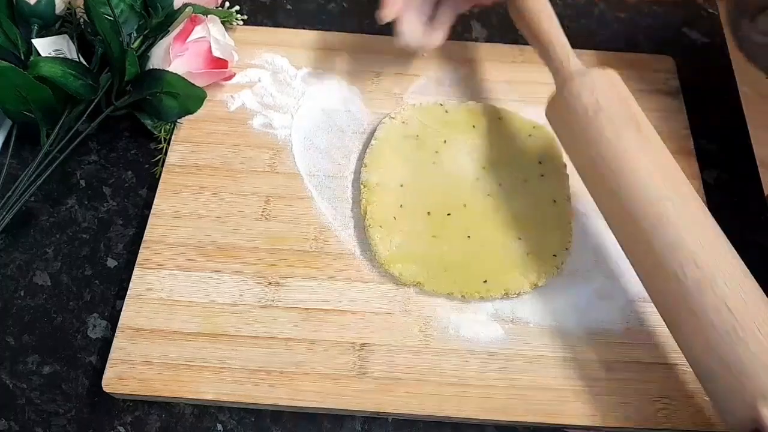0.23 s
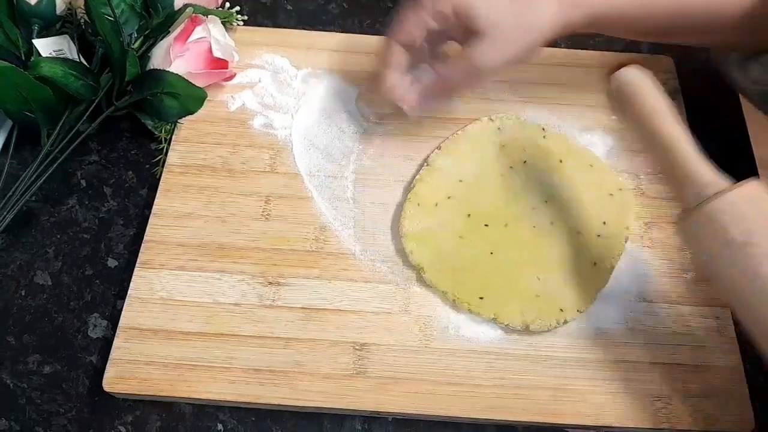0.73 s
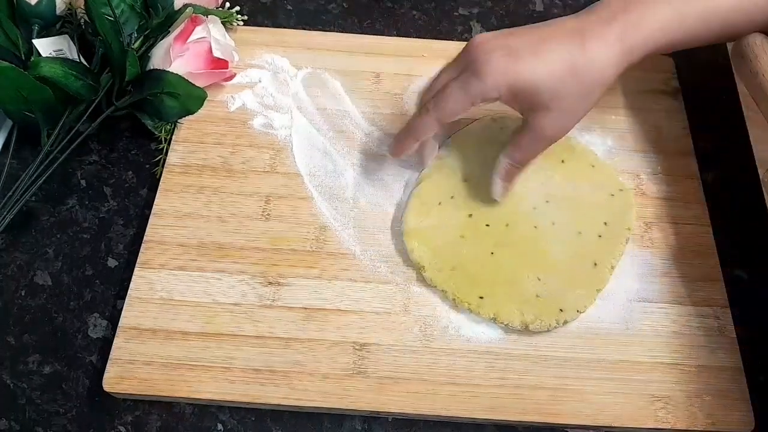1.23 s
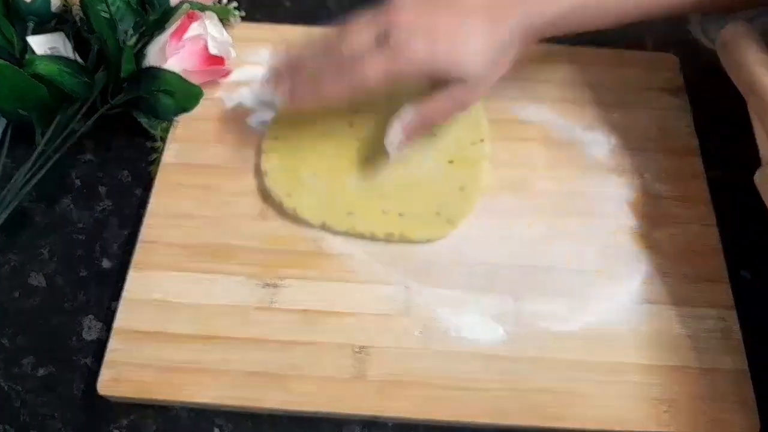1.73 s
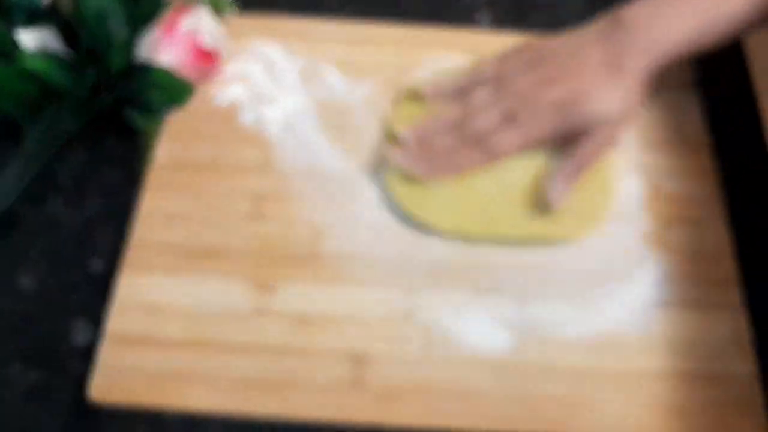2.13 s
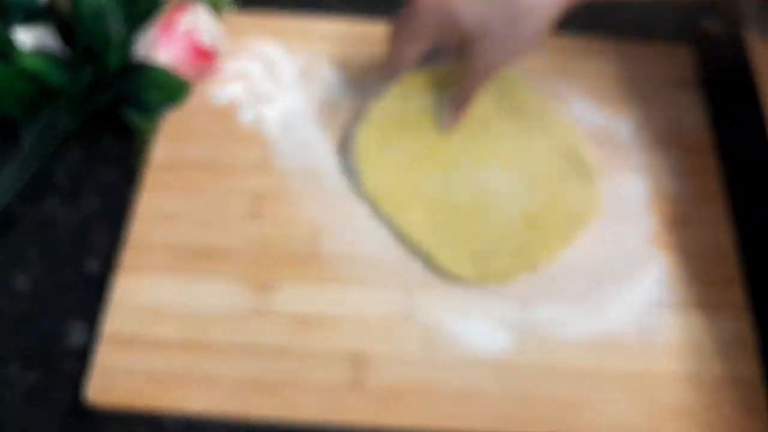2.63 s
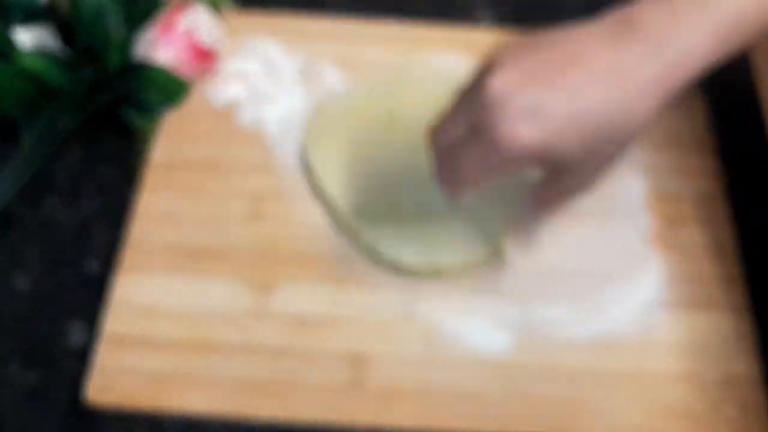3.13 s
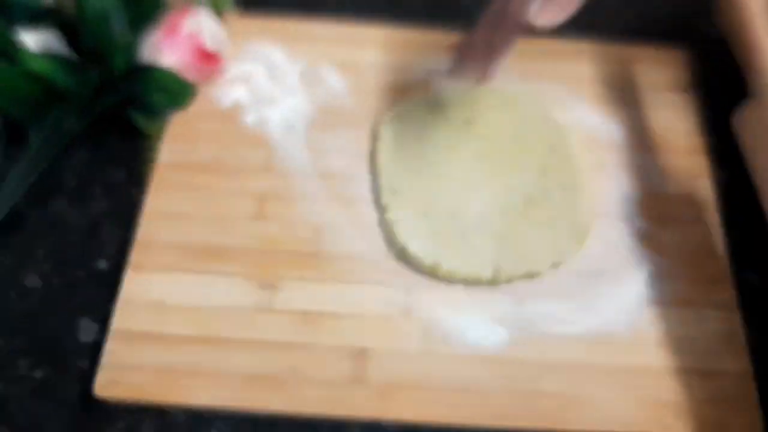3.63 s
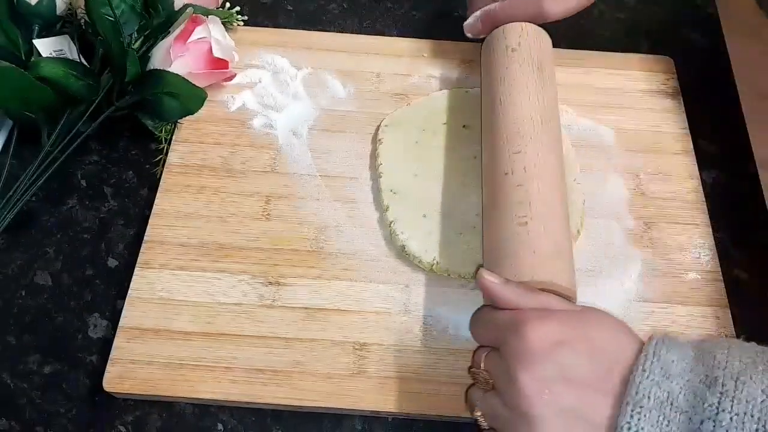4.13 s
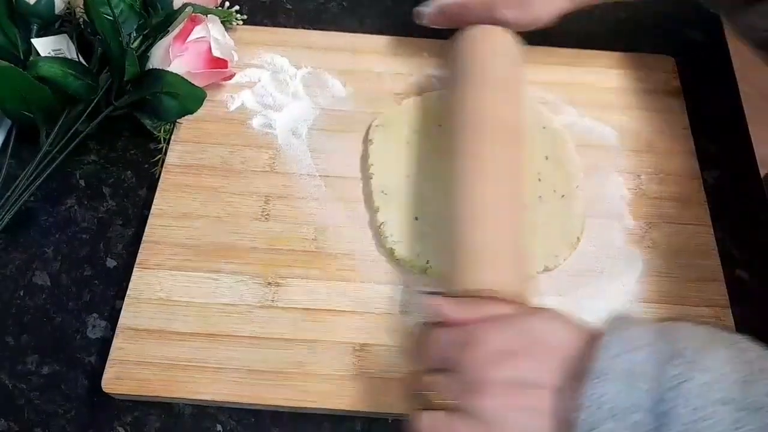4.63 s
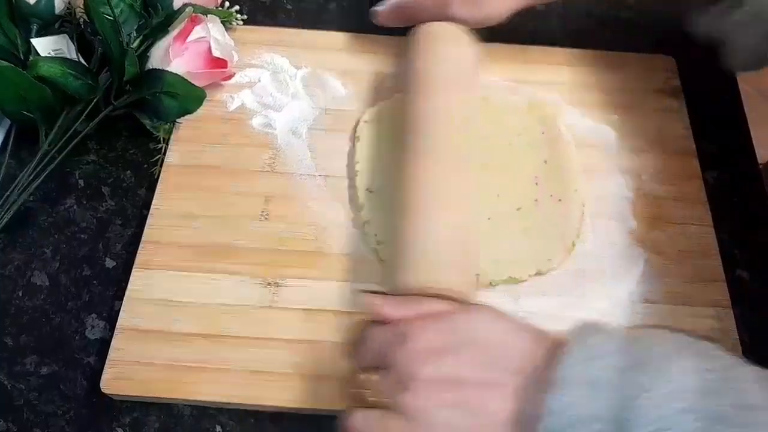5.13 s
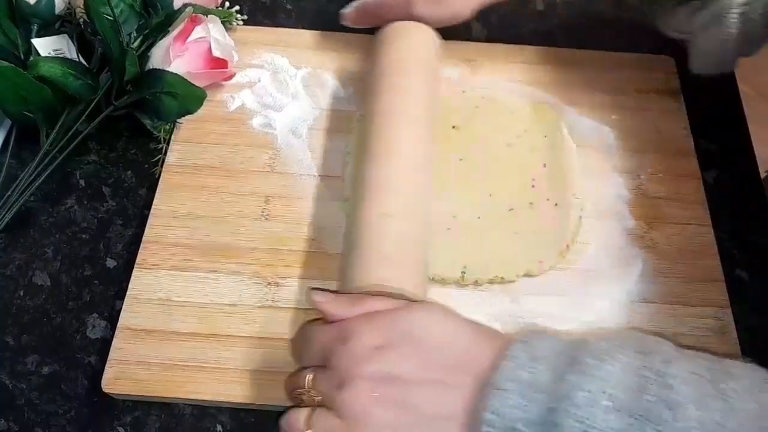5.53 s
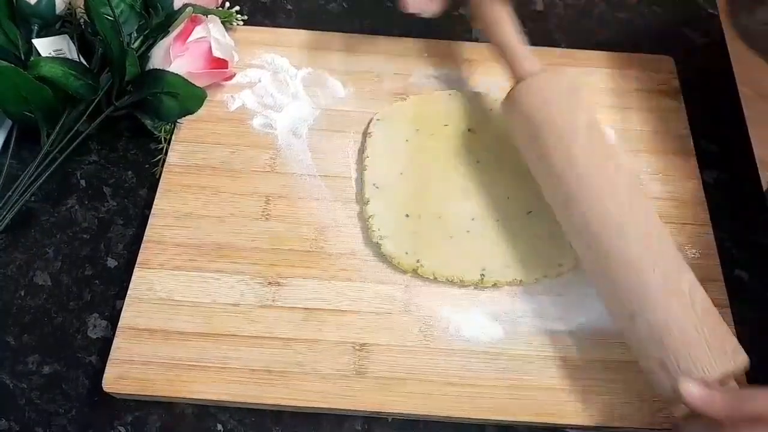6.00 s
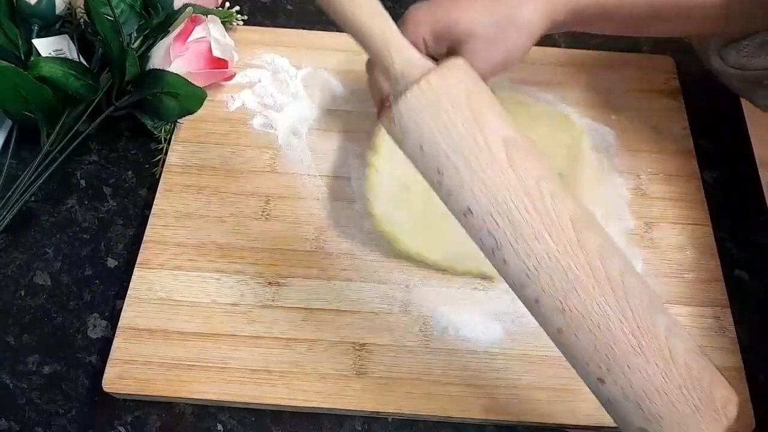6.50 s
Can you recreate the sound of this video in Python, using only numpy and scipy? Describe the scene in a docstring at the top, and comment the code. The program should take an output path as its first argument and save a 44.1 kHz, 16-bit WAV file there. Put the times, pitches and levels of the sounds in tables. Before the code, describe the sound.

In a kitchen, a wooden rolling pin clicks, then floured dough swishes across a wooden board. A sharp slap makes the board ring, followed by soft pats and more gritty sliding. The pin clicks again and rolls back and forth with quiet rubbing, a low rumble and soft thuds, then clicks once more. An appliance hums and hisses faintly behind the stereo sound.

```python
"""In a kitchen, a hand slides floured dough over a wooden board, pats and flips it, then rolls it out.
Flour dragging over the wood swishes, and skin or wood squeaks where it sticks. The board rumbles as
weight presses it against the counter. Soft pats thud, hard knocks make the board ring, and the wooden
rolling pin clicks now and then. An appliance hums and hisses behind it all.
The sound is heard through two microphone openings close together, left and right."""
import sys
import numpy as np
from scipy import signal
from scipy.fft import rfft, irfft
from scipy.io import wavfile
from scipy.ndimage import uniform_filter1d

SR = 44100
rng = np.random.default_rng(int(sys.argv[2]) if len(sys.argv) > 2 else 0)


def pcm_store(signal):
    """Save signal as 16-bit PCM."""
    levels = np.round(np.clip(np.atleast_2d(signal), -1, 1) * 32767)
    wavfile.write(sys.argv[1], SR, levels.astype(np.int16).T)


N = 298094

# The board's natural tones. Each row: pitch in Hz, level in dB, seconds to fade by 60 dB.
BOARD_TONES = [(317, -5.5, 0.041), (454, 3.5, 0.065), (569, 6, 0.027), (825, 2.5, 0.033),
               (1040, 5.5, 0.018), (1377, -14, 0.056), (1913, -3.5, 0.025), (2354, 1.5, 0.0084),
               (2854, -0.5, 0.011), (3770, -15, 0.0082), (4540, -12, 0.0062), (5800, -20, 0.0057)]
# How the two microphone openings compare. Each row: frequency in Hz, likeness from 0 to 1,
# how far the left wave leads in radians, how much louder the left is in dB.
MIC_PAIR = [(30.2, 0.8, 0.98, 0), (70, 0.99, 0.44, 1.5), (130, 0.9, 0.065, 4), (188, 0.8, -0.81, 8.5),
            (337, 0.37, 0.49, -0.5), (636, 0.66, -0.8, 8.5), (730, 0, 0.31, 10), (1180, 0, -1.48, 4),
            (1610, 0, -1.08, 3), (2500, 0.09, -0.76, 3.5), (3120, 0.24, -1.35, 6.5), (4000, 0, 0.26, 2),
            (6760, 0, 0.39, 2), (8300, 0.04, 1, 6.5), (11700, 0, -0.029, 3)]


def gain_of(db):
    """Turns decibels into a number to multiply a sound by."""
    return 10 ** (np.asarray(db) / 20)


def evened(x):
    """Scales a signal to an average power of 1."""
    return x / np.sqrt(np.mean(x ** 2) + 1e-20)


def wander(length, span):
    """A smooth random curve; a longer span, in samples, makes it slower."""
    return evened(uniform_filter1d(uniform_filter1d(rng.standard_normal(length), span), span))


def look_up(table, hz, column=1):
    """Reads a table at any frequency, gliding between its rows."""
    table = np.asarray(table)
    return np.interp(np.log(hz + 1), np.log(table[:, 0] + 1), table[:, column])


def add(mix, start, sound):
    """Mixes a sound in at a start time in seconds."""
    part = mix[round(start * SR):][:len(sound)]
    part += sound[:len(part)]


def mic_gains(hz):
    """How the left and right openings each scale and shift a wave."""
    left = gain_of(look_up(MIC_PAIR, hz, column=3) / 2) * np.exp(.5j * look_up(MIC_PAIR, hz, column=2))
    return np.array([left, 1 / left])


def noise(colour_db, patchy_db, size):
    """Stereo noise shaped by colour_db(hz, seconds), with drifting louder and softer patches."""
    hop = size // 4
    hz, t = np.fft.rfftfreq(size, 1 / SR)[:, None], np.arange(N // hop + 5) * hop / SR
    a, b, c, d, patches = rng.standard_normal((len(t), len(hz), 5)).T
    patches = uniform_filter1d(patches, size // 80, axis=0)
    patches = evened(uniform_filter1d(patches, 3000 // hop, axis=1))
    likeness = np.clip(look_up(MIC_PAIR, hz), 0, 1)
    left = a + 1j * b
    right = likeness * left + np.sqrt(1 - likeness ** 2) * (c + 1j * d)
    spectra = np.array([left, right]) * mic_gains(hz) * gain_of(colour_db(hz, t) + patchy_db * patches)
    out = signal.istft(spectra, nperseg=size, noverlap=size - hop)[1][:, :N]
    return out / np.sqrt(np.mean(out.mean(0) ** 2))


def swells(peak, db, rise, hold, fall, roundness):
    """Times, and each movement's power at those times; a rise or a fall covers 20 dB."""
    step_s = .002
    t = np.arange(0, N / SR + step_s, step_s)[:, None]
    away = np.maximum(np.maximum((peak - t) / rise, (t - peak - hold) / fall), 0)
    return t[:, 0], gain_of(db - 20 * away ** roundness) ** 2


def ring(tones, tilt_db):
    """Struck wood rings with fading tones; tilt_db per octave makes it brighter or duller."""
    t = np.arange(SR // 4) / SR
    out = np.zeros(len(t))
    for k, (hz, db, fade_s) in enumerate(tones):
        level = gain_of(db + tilt_db * np.log2(hz / 1000) - 60 * t / fade_s)
        out += (-1) ** k * level * np.sin(2 * np.pi * hz * t)  # neighbours start in opposite directions
    out *= 1 - np.exp(-t / 0.001)  # the contact takes a moment
    return out / abs(out).max()


def appliance():
    """An appliance hisses with fuzzy whistles while its motor gives a wavering hum."""
    # The shape of the hiss. Each row: frequency in Hz, level in dB.
    hiss_shape = [(15, -62), (25, 2), (183, -10.5), (313, -6.5), (741, -22.5), (1380, -35), (1530, -36.5),
                  (1950, -18.5), (3530, -44), (4620, -20), (5880, -31), (7290, -24.5), (15500, -39.5)]
    # Whistles in the hiss. Each row: pitch in Hz, width in Hz, boost in dB.
    whistles = [(265, 130, 7), (458, 8.6, 17), (1805, 260, 12), (4450, 230, 6), (7190, 540, 11)]
    # The motor's tones. Each row: pitch in Hz, level in dB.
    motor_tones = [(100, -68.5), (165, -64.5), (200, -64.5), (300, -70)]
    t = np.arange(N) / SR
    wavers_db = [2 * wander(N, span=3000) for _ in motor_tones]
    hum = np.zeros((2, N))
    for (hz, db), waver_db in zip(motor_tones, wavers_db):
        tone = np.sqrt(2) * np.sin(2 * np.pi * (hz * t + rng.random()))
        hum += gain_of(db + waver_db) * tone * abs(mic_gains(np.array([hz])))

    def colour(hz, _):
        whistle_db = sum(db / (1 + (2 * (hz - pitch) / width) ** 2) for pitch, width, db in whistles)
        return look_up(hiss_shape, hz) + whistle_db
    return gain_of(-61.5) * noise(colour, patchy_db=.6, size=2048) + hum


def board_rumble():
    """The board flexes on the counter; its low pitch shifts with where the weight lies."""
    # Weight leaning on the board. Each row: peak time in seconds, level in dB,
    # rise and fall in seconds, pitch in Hz.
    leans = [(.05, -52.5, 0.37, 0.057, 114), (.25, -62, .2, .12, 124), (.42, -71, 0.13, .9, 126),
             (.708, -51, 0.16, .35, 98), (.93, -52, 0.27, 0.13, 113), (1.15, -58.5, 0.16, 0.29, 112),
             (1.32, -50, .15, .11, 99), (1.65, -41, 0.073, 0.15, 107), (1.86, -55.5, .3, 0.54, 98),
             (2.1, -55.5, 0.46, 0.3, 115), (2.256, -52.5, .3, 0.089, 118), (2.426, -56, 0.059, .12, 112),
             (2.72, -59.5, 0.29, 0.13, 119), (3.11, -47.5, 0.082, 0.19, 95), (3.32, -53, 0.044, 0.73, 105),
             (3.45, -58, .3, 0.09, 106), (4.17, -48.5, 0.054, 0.26, 107), (4.68, -47, 0.12, 0.084, 112),
             (4.83, -54, .07, 0.45, 108), (4.98, -59, 0.31, 0.12, 111), (5.21, -47, .11, 0.19, 117),
             (5.42, -50.5, 0.32, 0.32, 128), (5.79, -51.5, 0.12, 0.062, 112), (6.08, -56.5, 0.13, .45, 105),
             (6.72, -61.5, 1, .9, 120)]
    peak, db, rise, fall, lean_hz = np.transpose(leans)
    times, power = swells(peak, db, rise, 0, fall, roundness=0.83)
    rest_power, rest_hz = gain_of(-91) ** 2, 125  # the board with no weight on it
    total = power.sum(1) + rest_power
    pitch = (power @ lean_hz + rest_hz * rest_power) / total

    def colour(hz, t):
        off_pitch = np.log((hz + 1) / np.interp(t, times, pitch)) / 0.68
        return -24 + 24 / (1 + off_pitch ** 2) - 20 * (hz > 400)
    flex = noise(colour, patchy_db=-1.1, size=2048)
    flex /= np.sqrt(uniform_filter1d(flex.mean(0) ** 2, 3500) + 0.019)  # smooths chance loudness swings
    return np.interp(np.arange(N) / SR, times, np.sqrt(total)) * flex


def flour_swish():
    """Flour grains drag over the wood with a gritty hiss, and the board's tones sing along."""
    # The shape of the flour's hiss. Each row: frequency in Hz, level in dB.
    flour_shape = [(210, -33), (350, -5), (692, -4.5), (786, -1.5), (906, -3.5), (1050, 0.5), (1660, -3),
                   (1880, -1.5), (2170, -5), (3720, -2), (8090, -6.5), (10400, -19.5), (14500, -27),
                   (15500, -31)]
    # Strokes of dough, hand or pin, and brief noisy tails of clicks and slaps. Each row: peak time in
    # seconds, level in dB, rise, hold and fall in seconds, then treble and body in dB above that level.
    strokes = [(0.032, -63, 0.13, .01, 0.18, -9, -1), (0.197, -74.5, 0.28, 0.31, 0.22, 1.5, -3.5),
               (0.524, -61.5, 0.2, 0.057, 0.14, -7, -5), (0.804, -64.5, 0.033, 0.031, 0.054, -3.5, -5),
               (0.899, -48, 0.035, 0.034, 0.077, -4.5, -10.5), (1.14, -64, 0.2, .04, 0.24, -4, -6),
               (1.278, -63.5, 0.15, 0.021, 0.084, -12, -0.5), (1.515, -56.5, 0.21, 0.074, .05, -6.5, -8),
               (1.612, -52, 0.016, 0.0078, 0.039, -9, -4), (1.648, -58, .04, 0.0086, 0.15, -12, 4),
               (1.822, -46.5, 0.045, 0.13, 0.35, -8.5, -6.5), (2.09, -48.5, 0.21, 0.06, 0.14, -8, -7),
               (2.226, -57, 0.085, .03, 0.061, -5, -13), (2.487, -62, 0.14, .03, 0.47, -5.5, -5.5),
               (2.754, -61, 0.13, .02, 0.1, -6, -6), (3.065, -57, 0.024, 0.016, 0.095, -4, -5.5),
               (3.375, -54, 0.075, 0.097, 0.094, -8, -6.5), (4.137, -62.5, 0.0097, 0.0079, 0.074, -21, 4),
               (4.255, -67, .2, 0.18, 0.12, -6, -6.5), (4.647, -59, 0.083, 0.045, .09, -3.5, -6.5),
               (4.82, -62.5, 0.17, .12, .13, -6.5, -6.5), (5.184, -62, 0.27, 0.078, 0.063, -4, -6.5),
               (5.374, -61, .16, 0.053, 0.3, -7, -5.5), (5.683, -63.5, 0.17, 0.11, 0.4, -6, -11),
               (6.184, -60.5, .08, .01, 0.29, -3.5, -2), (6.49, -62, 0.11, 0.23, .2, -6, -3)]
    still_hiss_db, still_treble_db, still_body_db = -81, -78.5, -76.5  # between strokes
    *stroke_shape, treble_db, body_db = np.transpose(strokes)
    times, power = swells(*stroke_shape, roundness=1.007)

    def band(low_hz, high_hz, relative_db, still_db):
        def colour(hz, _):
            above_low, above_high = (1 / (1 + (edge / (hz + 1)) ** 12) for edge in (low_hz, high_hz))
            band_db = 10 * np.log10(above_low * (1 - above_high) + 1e-5)
            board_db = sum(1.8 / (1 + (2 * (hz - pitch) / 70) ** 2) for pitch, _, _ in BOARD_TONES)
            return look_up(flour_shape, hz) + board_db + band_db
        level = np.sqrt(power @ gain_of(relative_db) ** 2 + gain_of(still_db) ** 2)
        return np.interp(np.arange(N) / SR, times, level) * noise(colour, patchy_db=1.98, size=1024)
    grit = gain_of(0.51 * evened(uniform_filter1d(rng.standard_normal(N), 120)))  # grains catch and slip
    hiss = band(1755, 9900, np.zeros(len(strokes)), still_hiss_db)
    fine_treble = band(12400, SR, treble_db, still_treble_db)
    dull_body = band(1, 1570, body_db, still_body_db)
    return grit * (hiss + fine_treble + dull_body)


def dry_clicks():
    """Dry ticks with a short wooden ring: the pin's clicks and the crack of a slap."""
    # Clicks and a crack. Each row: start in seconds, tick level in dB, tick pitch in Hz, ring in dB.
    clicks = [(0.0256, -25.5, 2320, -42.5), (.030, -33, 1290, -34), (1.6151, -34.5, 4570, -47),
              (3.314, -49, 1500, -65), (4.1346, -29, 2200, -26.5), (4.186, -36, 1890, -59),
              (5.8353, -30, 1470, -42), (5.8435, -39, 1300, -61)]
    # The pin's natural tones. Each row: pitch in Hz, level in dB, seconds to fade by 60 dB.
    pin_tones = [(698, 8.5, 0.017), (1296, 1.5, 0.029), (1830, -12, 0.041), (2450, 7.5, 0.017),
                 (3040, -1.5, 0.051), (3154, 5.5, 0.046), (4080, -17, 0.018), (5660, -17, .02)]
    out = np.zeros(N)
    t = np.arange(SR // 3) / SR - .0006  # counted from the middle of the tick
    for start, tick_db, hz, ring_db in clicks:
        tick = -np.cos(2 * np.pi * hz * t) * np.exp(-(t / 0.00026) ** 2)
        add(out, start, gain_of(tick_db) * tick)
        add(out, start, gain_of(ring_db) * ring(pin_tones, tilt_db=2.5))
    return out


def dough_thuds():
    """A soft push swells into a low thud, and the counter rings with a deeper tone."""
    # Pats and landings. Each row: start in seconds, level in dB, pitch in Hz, seconds to fade by 60 dB,
    # swell in seconds, the counter's tone in dB compared with the push.
    pats = [(.879, -25, 127, 0.052, 0.01, -14.5), (1.279, -40, 90.5, 0.14, 0.0052, -4),
            (1.622, -21, 121.4, 0.13, 0.00084, -9), (1.698, -31.5, 109.4, 0.17, 0.0029, -7),
            (1.782, -27, 130, 0.12, 0.0083, -4), (3.032, -37, 134, 0.058, 0.0022, -28),
            (3.057, -33, 120, 0.2, 0.00076, -21.5), (3.319, -31.5, 79, 0.069, 0.0022, -9),
            (4.136, -51, 77, 0.14, 0.0028, -1), (4.643, -45, 134, 0.13, .005, -6),
            (4.811, -45, 100.6, 0.48, 0.0084, -19), (5.188, -40, 127, 0.46, .015, -20),
            (5.373, -37, 141, 0.21, 0.014, -27)]
    counter_hz, counter_fade_s = 72, 0.17
    out, t = np.zeros(N), np.arange(SR // 3) / SR
    for start, db, hz, fade_s, swell_s, counter_db in pats:
        rise = 1 - np.exp(-t / swell_s)
        push = np.sin(2 * np.pi * hz * t) * gain_of(-60 * t / fade_s)
        counter = np.sin(2 * np.pi * counter_hz * t) * gain_of(counter_db - 60 * t / counter_fade_s)
        add(out, start, gain_of(db) * rise * (push + counter))
    return out


def squeaks():
    """Skin or wood sticks as it rubs, making a short noise close to one pitch."""
    # Squeaky rubs. Each row: start in seconds, length in seconds, level in dB, pitch in Hz.
    rubs = [(0.882, 0.12, -62, 1202), (.89, 0.095, -57, 3000), (3.421, 0.12, -59, 1917),
            (5.17, .08, -65, 3240), (5.671, 0.085, -67, 3220), (6.169, 0.043, -62, 2900)]
    out, t = np.zeros(N), np.arange(SR // 4) / SR
    for start, length, db, hz in rubs:
        phase = 2 * np.pi * hz * t
        rough_tone = wander(len(t), span=150) * np.cos(phase) + wander(len(t), span=150) * np.sin(phase)
        stroke = np.sin(np.pi * np.clip(t / length, 0, 1)) ** 2
        add(out, start, gain_of(db) * stroke * rough_tone)
    return out


def board_knocks():
    """A hard knock sets all the board's tones ringing."""
    # Knocks on the board. Each row: start in seconds, level in dB, brightness in dB per octave.
    knocks = [(1.615, -18.5, 4), (3.058, -42, -2.5), (3.314, -54, -1), (4.1863, -39, -2),
              (5.844, -47.5, -8)]
    out = np.zeros(N)
    for start, db, tilt_db in knocks:
        add(out, start, gain_of(db) * ring(BOARD_TONES, tilt_db))
    return out


def room_echo(sound):
    """The room sends back many small echoes, and the high pitches die first."""
    # How long the room rings. Each row: frequency in Hz, seconds to fade by 60 dB.
    fade_times = [(200, 0.61), (1000, 0.45), (4000, 0.24)]
    echoes = np.zeros((2, SR // 2))
    slots = np.arange(120, SR // 2 - 20, 20)
    arrivals = slots + rng.integers(0, 20, (2, len(slots)))
    np.put_along_axis(echoes, arrivals, rng.choice([-1., 1.], arrivals.shape), 1)
    hz, t, spectra = signal.stft(echoes, SR, nperseg=256)
    fade_db = -60 * t / look_up(fade_times, hz)[:, None]
    bass_cut_db = 20 * (hz < 200)[:, None]
    tail = signal.istft(spectra * gain_of(fade_db - bass_cut_db), SR, nperseg=256)[1]
    return signal.fftconvolve(sound[None], tail / np.linalg.norm(tail[0]), axes=1)[:, :N]


def scene():
    """All the sounds at the two openings; only the short ones get an echo."""
    hits = dry_clicks() + dough_thuds() + squeaks() + board_knocks()
    direct = irfft(rfft(hits) * mic_gains(np.fft.rfftfreq(N, 1 / SR)), N)
    echo = gain_of(-8.0) * room_echo(hits) * gain_of([[1.9], [-2.1]])  # louder on the left
    return direct + echo + flour_swish() + board_rumble() + appliance()


def record(dry):
    """The microphone loses the deepest bass, then the highest treble is cut off."""
    lowest_hz, highest_hz = 47, 15600
    thin = signal.sosfilt(signal.butter(4, lowest_hz, "high", fs=SR, output="sos"), dry)
    treble_cut = signal.firwin(511, highest_hz, window=("kaiser", 9), fs=SR)
    return signal.oaconvolve(thin, treble_cut[None], "same")


dry = scene()
out = record(dry)
pcm_store(out)
```